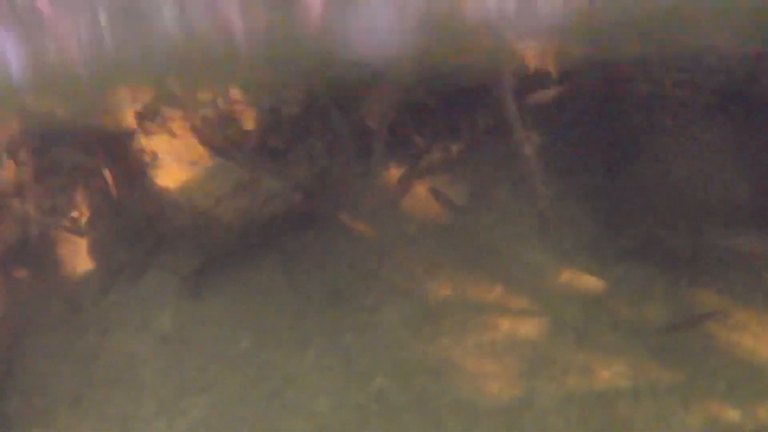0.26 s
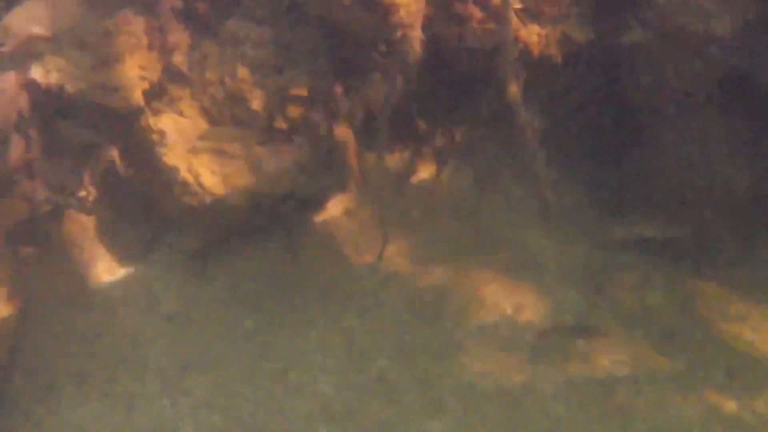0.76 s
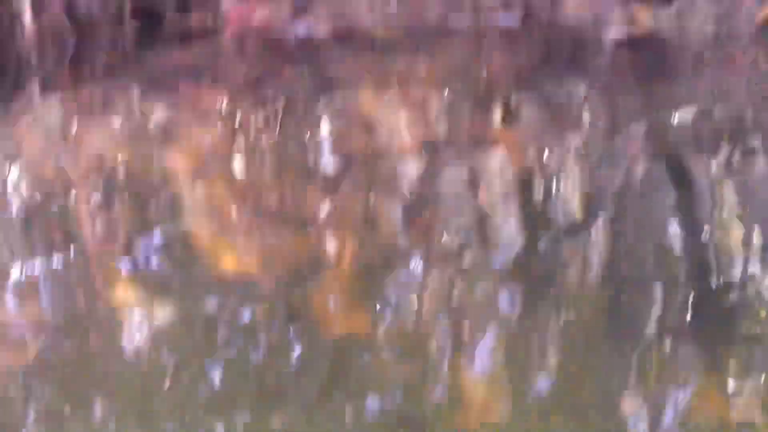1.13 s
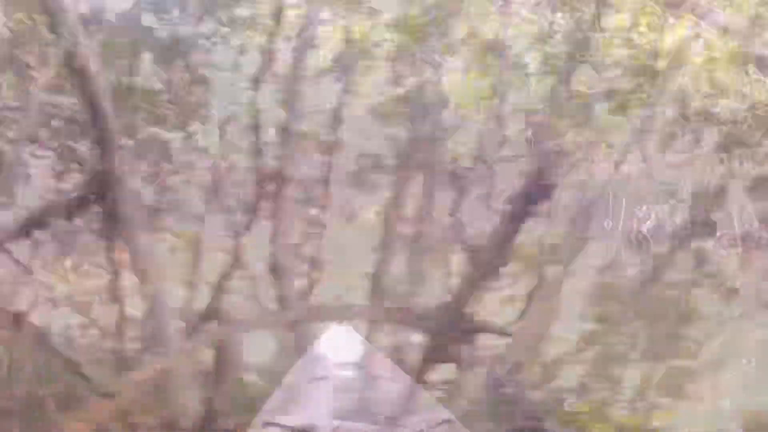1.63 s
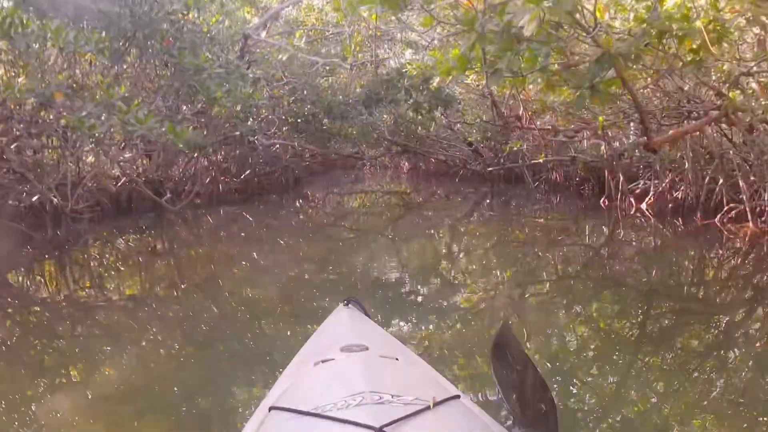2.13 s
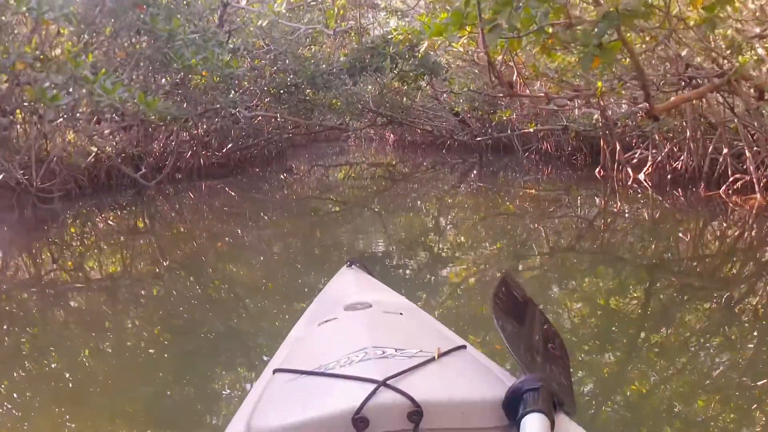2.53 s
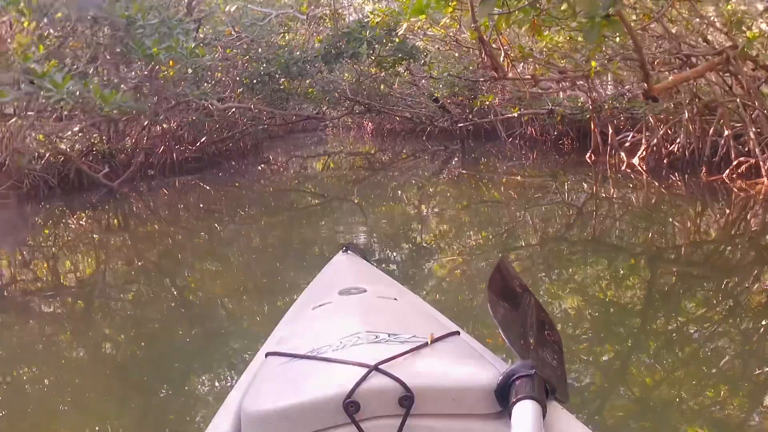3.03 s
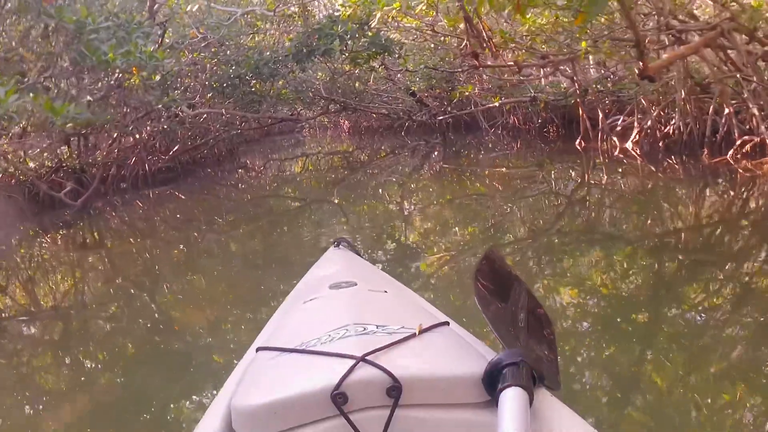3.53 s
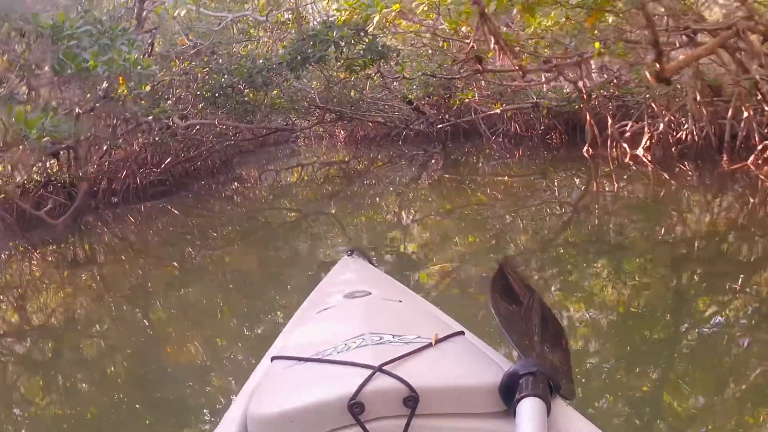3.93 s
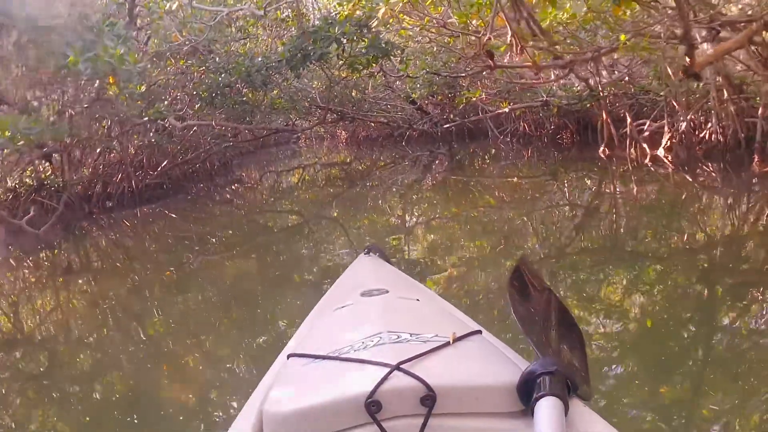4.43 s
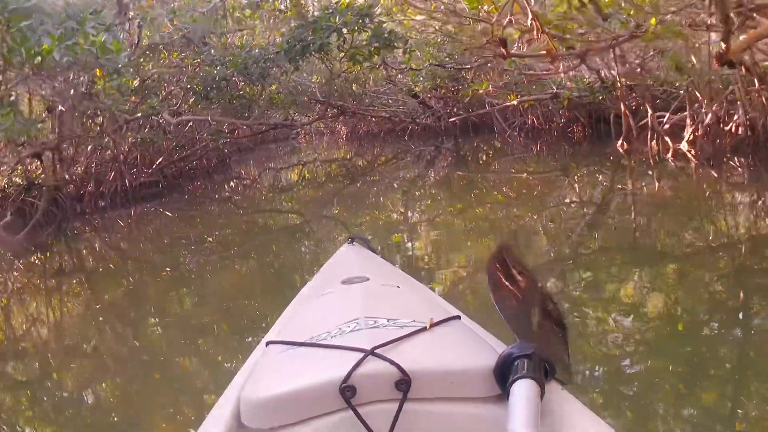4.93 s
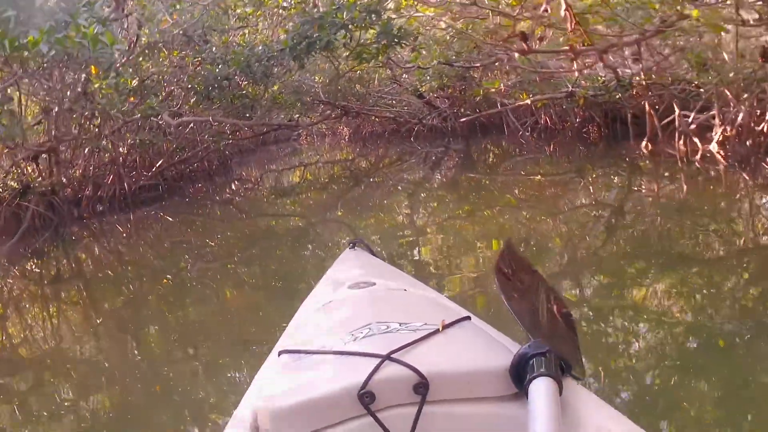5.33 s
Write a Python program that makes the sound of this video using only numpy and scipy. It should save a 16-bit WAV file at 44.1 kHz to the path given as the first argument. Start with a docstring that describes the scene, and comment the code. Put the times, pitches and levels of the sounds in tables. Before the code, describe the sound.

Inside a waterproof plastic case, dull water surges and low bumps buffet the microphone. It breaks the surface with a huge clipped thump, ticks and bright drips, followed by rubbing and hollow knocks. One sharp woody tap gives way to soft hiss, sparse dull thuds and a faint wavering motor hum outdoors; near the end small splashes and bubbles lap at the kayak hull.

```python
"""Waterproof case lifted from a creek

A waterproof case with a microphone inside is dragged through a creek beside a kayak and lifted out. Shaped
noise rumbles on the case, sine bubbles plink, and a thump at the surface overloads the input. Under water and
in the air, filtered blows and grains knock and rub the case's modes, and once it is out a far motor hums in
wavering sines. A late swish of grains and bubbles laps by the hull, over a soft hiss."""
import sys
import numpy as np
from scipy import signal
from scipy.fft import rfft, irfft
from scipy.io import wavfile
from scipy.ndimage import uniform_filter1d, map_coordinates

SR = 44100
rng = np.random.default_rng(int(sys.argv[2]) if len(sys.argv) > 2 else 0)


def log_audio(samples):
    """Write samples as a 16-bit WAV file to the path given in sys.argv[1]."""
    # one column per channel
    frames = np.atleast_2d(samples).T
    # limit to full scale, then quantise
    limited = np.clip(frames, -1, 1)
    pcm = np.round(limited * 32767).astype(np.int16)
    wavfile.write(sys.argv[1], SR, pcm)


N = 245195
TIME = np.arange(N) / SR

# background hiss spectrum: frequency_hz, density_db (relative, per Hz)
HISS_SPECTRUM = [(150, -4.5), (260, -5.5), (626, -8), (744, -8.5), (1110, -12.5), (1410, -13.5),
                 (1530, -14), (3760, -19.5), (13900, -25.5), (16000, -25.5)]
# low pressure swell spectrum: frequency_hz, density_db (relative, per Hz)
SWAY_SPECTRUM = [(5, -1), (10, 6.5), (22, -1.5), (35, -9), (50, -25.5), (80, -27), (140, -61), (300, -80)]
# eddies against the case, spectrum: frequency_hz, density_db (relative, per Hz)
CHURN_SPECTRUM = [(25, -11.5), (50, 8), (90, 3), (160, 1.5), (220, -8), (300, -9), (420, -18), (620, -40),
                  (1200, -65)]
# splashing by the hull, spectrum: frequency_hz, density_db (relative, per Hz)
SWISH_SPECTRUM = [(150, -29), (260, 4), (420, 1.5), (570, -8), (820, 4.5), (1140, -10), (1430, -7.5),
                  (2200, -9.5), (2700, -21), (4500, -16), (7000, -38), (13000, -45)]
# pitch of the far motor's upper tone: time_s, pitch_hz
MOTOR_PITCH = [(2.1, 175.5), (3.5, 177.6), (3.62, 179.8), (4.38, 179.8), (4.56, 176.3), (5.2, 180.7),
               (5.3, 176.1)]
# eddies that surge and die away: peak_s, peak_db, fall_db_per_s
SURGES = [(.07, -34, 99), (.607, -27.5, 217), (.71, -37, 280), (0.838, -25, 168), (0.969, -27, 35.5),
          (1.33, -35, 120), (1.58, -42.5, 61)]
# one slow wash along the hull: full_level_s, hold_s, level_db
HULL_WASH = [(4.82, 0.48, -59.5)]
# wavelets lapping around that wash: peak_s, peak_db
LAPS = [(4.8, -60), (4.92, -56.5), (4.99, -57.5), (5.3, -54)]
# modes of the plastic case: pitch_hz, gain_db, t60_s
CASE_MODES = [(191.8, 1.5, 0.18), (312, -11, 0.06), (409, -0.5, 0.032), (509, 3, 0.014), (834, -0.5, 0.036),
              (1044, -4.5, 0.019), (1348, -6, 0.029), (1736, -3.5, 0.01), (2130, -4.5, 0.014),
              (2600, -12.5, 0.02), (3350, -4.5, 0.0052), (4650, -18.5, 0.021), (4900, -19, 0.011),
              (5700, -31.5, .015)]
# water and fingers sliding over the case: full_level_s, hold_s, level_db
SLIDES = [(0.065, 0.15, -59), (0.842, 0.3, -55), (0.998, 0.25, -50.5), (1.217, 0.2, -48),
          (1.524, 0.072, -45), (1.734, 0.065, -49), (1.875, 0.33, -56.5)]
# drops falling on the water: start_s, bubble_level_db, bubble_pitch_hz,
# splat_level_db (against the bubble), splat_reach_hz
WATER_DROPS = [(1.1512, -26, 4350, -9, 4840), (1.1898, -31.5, 3660, 5.5, 12200),
               (1.209, -43, 1640, -15, 4000), (1.2265, -41, 4220, 3.5, 5500),
               (1.240, -46.5, 3430, -4, 9000), (1.2525, -48, 3380, -13, 4000),
               (1.2705, -41.5, 3220, -4.5, 4520), (1.2715, -40.5, 2450, 4.5, 4000),
               (4.722, -55.5, 3750, -1, 4500), (5.119, -53, 2230, -8, 3000), (5.158, -45, 850, -6, 2000),
               (5.164, -49, 2200, -1, 2500), (5.207, -44, 1424, 2, 2370), (5.308, -41, 940, -1.5, 1785)]
# blows on the case, soft bumps to hard ticks: start_s, peak_db, contact_centre_hz, scuff_decay_s
CASE_KNOCKS = [(0.064, -36.5, 394, 0.016), (.176, -40, 640, 0.0016), (0.599, -22.5, 87.4, 0.0021),
               (0.604, -33.5, 420, .0022), (0.699, -24, 102, 0.0024), (.726, -45, 870, 0.0061),
               (0.832, -28, 169, 0.0056), (.843, -44, 870, 0.0061), (.893, -28, 160, 0.002),
               (1.008, -40.5, 900, 0.0048), (1.140, -40, 2300, 0.0022), (1.190, -33.5, 1200, 0.0034),
               (1.357, -38, 1700, .005), (1.364, -26, 265, 0.02), (1.508, -34, 740, 0.0033),
               (1.595, -28, 1500, 0.0029), (1.596, -42.5, 4400, 0.0028), (1.604, -30.5, 250, 0.0044),
               (1.687, -37.5, 180, .004), (1.844, -40, 960, .013), (1.937, -37, 433, 0.0014),
               (1.968, -38, 980, 0.00065), (1.969, -26, 327, 0.0012), (2.180, -34.5, 79, .002),
               (2.388, -33.5, 68, .0023), (2.563, -38, 120, .002), (2.895, -32, 166, .0011),
               (3.655, -35.5, 151, 0.0056), (4.074, -32, 77.5, 0.0046)]
# modes of a sharp, woody tap on the boat's gear: pitch_hz, level_db (relative), t60_s
TAP_MODES = [(920, 3, 0.023), (1386, -3, 0.03), (1620, 3.5, 0.026), (2000, -14, .03), (2340, -2, 0.022),
             (3800, -17, 0.0087), (4970, -18, 0.0098)]
# ticks riding on the thump: start_s, peak_db
THUMP_TICKS = [(1.29, -24.5), (1.2977, -30), (1.3058, -52)]

SURFACE_S = 1.287   # the case breaks the surface
HISS_DB, HISS_DIP_S, HISS_DIP_WIDTH_S, HISS_DIP_DB = -57, 1.65, 0.44, -2.5   # the hiss dips briefly
MOTOR_FROM_S, MOTOR_HOLD_S, MOTOR_DB = 2.16, 2.24, -49.5   # upper tone at full level
MOTOR_FADE_IN_DB_PER_S, MOTOR_FADE_OUT_DB_PER_S = 19.5, 11.5
# the swell grows as the case is lifted towards the surface and settles once it is out
SWAY_REST_DB, SWAY_LIFT_DB = -35, -20
LIFT_RISE_DB_PER_S, LIFT_FALL_DB_PER_S = 17, 46.5
ROCK_DB, ROCK_PERIOD_S, ROCK_CREST_S = 1, 1.79, 4.06   # at rest the swell waxes and wanes slowly
SURGE_RISE_DB_PER_S, SUBMERGED_DB = 417, -50.5   # fast build; a little stirring while under water
WASH_RISE_DB_PER_S, WASH_FALL_DB_PER_S = 38, 42
LAP_RISE_DB_PER_S, LAP_FALL_DB_PER_S = 240, 220
SLIDE_RISE_DB_PER_S, SLIDE_FALL_DB_PER_S = 347, 165
BUBBLE_T60_S, BUBBLE_REF_HZ, BUBBLE_SIZE_LAW = 0.021, 3500, 0.85   # lower-pitched bubbles ring longer
SPLAT_T60_S, SPLAT_TOP_HZ = 0.017, 4000
CONTACT_OCTAVES = 1.24   # width of the band that a blow excites
TAP_S, TAP_DB = 2.074, -24.5
CUTOFF_HZ = 15800


def from_db(db):
    """Decibels to gain."""
    return 10 ** (np.asarray(db) / 20)


def rms_one(x):
    """Scale to rms 1."""
    return x / np.sqrt(np.mean(x ** 2) + 1e-20)


def peak_one(x):
    """Scale to peak 1."""
    return x / (np.abs(x).max() + 1e-20)


def add(out, s, sound):
    """Mix a sound in at time s."""
    at = max(round(s * SR), 0)
    out[at:at + len(sound)] += sound[:N - at]


def band(x, low_hz, high_hz, order=2):
    """Causal band-pass."""
    edges_hz = [max(low_hz, 10), min(high_hz, .45 * SR)]
    return signal.sosfilt(signal.butter(order, edges_hz, "band", fs=SR, output="sos"), x)


def coloured(x, spectrum):
    """Give a steady sound a spectrum; rms 1."""
    hz, db = np.transpose(spectrum)
    bins_hz = np.fft.rfftfreq(N, 1 / SR) + 0.0009   # keeps the logarithm finite at 0 Hz
    gain = from_db(np.interp(np.log(bins_hz), np.log(hz), db))
    return rms_one(irfft(rfft(x) * gain, N))


def drift(rate):
    """Smooth random wander through `rate` new values a second; rms 1."""
    knots = rng.standard_normal(2000)
    return rms_one(map_coordinates(knots, [TIME * rate], order=2, mode="wrap"))


def grains(per_s, spread_db):
    """Random tiny impacts, a few much larger than the rest."""
    sizes = from_db(spread_db * np.minimum(rng.exponential(1, N), 4)) * rng.choice([-1, 1], N)
    return sizes * (rng.random(N) < per_s / SR)


def swell_and_fade(full_s, hold_s, db, rise_db_per_s, fall_db_per_s):
    """Gain that rises to its level at full_s, holds, then dies away."""
    early = np.maximum(full_s - TIME, 0)
    late = np.maximum(TIME - full_s - hold_s, 0)
    return from_db(db - rise_db_per_s * early - fall_db_per_s * late)


def together(gains):
    """Overlapping movements add in power."""
    return np.sqrt(np.sum(np.square(gains), axis=0))


def case(force):
    """The plastic case rings in all its modes, each a two-pole resonator driven by the force."""
    out = 0
    for k, (hz, db, t60) in enumerate(CASE_MODES):
        radius = from_db(-60 / (t60 * SR))
        angle = 2 * np.pi * hz / SR
        poles = [1, -2 * radius * np.cos(angle), radius * radius]
        ring = signal.lfilter([1, 0, -1], poles, force + 1e-18)
        out = out + (-1) ** k * from_db(db) * ring   # alternate modes are inverted
    return out


def air():
    """Steady soft hiss of shaped noise that dips briefly."""
    dip_db = HISS_DIP_DB * np.exp(-((TIME - HISS_DIP_S) / HISS_DIP_WIDTH_S) ** 2)
    return from_db(HISS_DB + dip_db) * coloured(rng.standard_normal(N), HISS_SPECTRUM)


def motor(octave_db=-22, lower_ratio=.637, lower_db=-57.0, drone_db=-53):
    """Two wavering tones over a dull drone, heard only above the water; the upper has a faint octave."""
    times_s, pitches_hz = np.transpose(MOTOR_PITCH)
    phase = 2 * np.pi * np.cumsum(np.interp(TIME, times_s, pitches_hz)) / SR
    level = swell_and_fade(MOTOR_FROM_S, MOTOR_HOLD_S, MOTOR_DB,
                           MOTOR_FADE_IN_DB_PER_S, MOTOR_FADE_OUT_DB_PER_S)
    wavering = phase + .15 * drift(10)
    tone = np.sin(wavering) + from_db(octave_db) * np.sin(2 * wavering)
    upper = tone * level * from_db(1.3 * drift(7.5))
    lower = np.sin(lower_ratio * phase + .6 * drift(7)) * from_db(lower_db + 1.5 * drift(8))
    drone = from_db(drone_db) * rms_one(band(rng.standard_normal(N), 43, 190))
    above_water = np.clip((TIME - SURFACE_S) / 0.26, 0, 1)
    return above_water * (np.sqrt(2) * (upper + lower) + drone)   # root two: tone levels are rms


def sway():
    """Very low pressure swell as the case is moved about; it pauses as the surface is crossed."""
    swell = coloured(rng.standard_normal(N), SWAY_SPECTRUM)
    power = band(swell, 22, 55) ** 2
    # the audible part is held steady
    evened = swell / np.sqrt(uniform_filter1d(power, size=8000) + 0.1 * power.mean())
    crossing = np.exp(-((TIME - SURFACE_S) / .05) ** 4)
    lift = swell_and_fade(SURFACE_S, 0, SWAY_LIFT_DB, LIFT_RISE_DB_PER_S, LIFT_FALL_DB_PER_S)
    rock_db = ROCK_DB * np.cos(2 * np.pi * (TIME - ROCK_CREST_S) / ROCK_PERIOD_S)
    rest = from_db(SWAY_REST_DB + rock_db)
    return np.maximum(lift, rest) * (1 - crossing) * evened


def churn():
    """Eddies buffet the case: dense low-coloured grains surge and die away."""
    surges = [swell_and_fade(s, 0, db, SURGE_RISE_DB_PER_S, fall) for s, db, fall in SURGES]
    stirring = from_db(SUBMERGED_DB) * (TIME < SURFACE_S)
    buffeting = coloured(grains(per_s=600, spread_db=2.0), CHURN_SPECTRUM)
    return together([stirring, *surges]) * buffeting


def burble(count=90, low_hz=620, high_hz=2400, cycles=22, bend=0.15, spread_db=12.0):
    """Small bubbles at random times; each rings down as its pitch rises, higher ones softer."""
    out, t = np.zeros(N), TIME[:SR // 12]
    for when, smallness, strength in rng.random((count, 3)):
        hz = low_hz * (high_hz / low_hz) ** smallness
        life = t * hz / cycles   # reaches 1 when the ring is 60 dB down
        phase = 2 * np.pi * hz * t * (1 + bend * np.minimum(life, 1))
        ring = np.sin(phase) * from_db(-60 * life)
        add(out, 4.3 + 1.25 * when, from_db(spread_db * strength) * np.sqrt(low_hz / hz) * ring)
    return out / out[TIME > 4.3].std()


def swish(case_db=-7.0, wash_db=0.0, bubble_db=-4.5):
    """Fine splashing and bubbles by the hull, coloured by the case that they are heard through."""
    wash = from_db(wash_db) * coloured(grains(per_s=2000, spread_db=1.5), SWISH_SPECTRUM)
    splashes = band(grains(per_s=300, spread_db=8.5), 364, 4900, order=1)
    ringing = from_db(case_db) * rms_one(case(splashes))
    flow = [swell_and_fade(s, hold_s, db, WASH_RISE_DB_PER_S, WASH_FALL_DB_PER_S)
            for s, hold_s, db in HULL_WASH]
    laps = [swell_and_fade(s, 0, db, LAP_RISE_DB_PER_S, LAP_FALL_DB_PER_S) for s, db in LAPS]
    return together(flow + laps) * (wash + ringing + from_db(bubble_db) * burble())


def rub():
    """Tiny slips on the wet case excite its modes."""
    slides = [swell_and_fade(s, hold_s, db, SLIDE_RISE_DB_PER_S, SLIDE_FALL_DB_PER_S)
              for s, hold_s, db in SLIDES]
    return together(slides) * rms_one(case(grains(per_s=1100, spread_db=3.5)))


def drops():
    """A drop splats as a noise burst and traps a small bubble that rings as a decaying sine."""
    out, t = np.zeros(N), TIME[:SR // 10]
    for s, db, hz, splat_db, reach_hz in WATER_DROPS:
        t60 = BUBBLE_T60_S * (BUBBLE_REF_HZ / hz) ** BUBBLE_SIZE_LAW
        onset = 1 - np.exp(-t / .0004)
        bubble = np.sin(2 * np.pi * hz * t) * from_db(-60 * t / t60) * onset
        burst = rng.standard_normal(len(t)) * from_db(-60 * t / SPLAT_T60_S)
        splat = band(band(burst, 670, reach_hz, order=4), 430, SPLAT_TOP_HZ, order=1)
        add(out, s, from_db(db) * (peak_one(bubble) + from_db(splat_db) * peak_one(splat)))
    return out


def knocks(scuff=0.13, thud_hz=130):
    """Each blow is a push and a short scuff; slow pushes pass as a dull thud, quick ones ring the case."""
    out, t = np.zeros(N), TIME[:SR // 5]
    half_width = 2 ** (CONTACT_OCTAVES / 2)
    for s, db, hz, scuff_s in CASE_KNOCKS:
        low_hz, high_hz = hz / half_width, hz * half_width
        grit_gain = scuff * min(high_hz / 1000, 2)   # quicker contacts are grittier
        grit = grit_gain * rng.standard_normal(len(t)) * np.exp(-t / scuff_s)
        force = band((t == 0) + grit, low_hz, high_hz)
        thud = (thud_hz / low_hz) ** 2 * peak_one(force)
        add(out, s, from_db(db) * peak_one(peak_one(case(force)) + thud))
    return out


def tap():
    """A hard contact sets a few short modes ringing."""
    out, t = np.zeros(N), TIME[:SR // 10]
    ring = np.zeros(len(t))
    for k, (hz, db, t60) in enumerate(TAP_MODES):
        ring += (-1) ** k * from_db(db - 60 * t / t60) * np.sin(2 * np.pi * hz * t)
    add(out, TAP_S, from_db(TAP_DB) * peak_one(ring))
    return out


def crackle(dull_hz=900):
    """Bare sharp ticks that ride on the thump, each an instant jump and a quick decay."""
    out, t = np.zeros(N), TIME[:SR // 100]
    for s, db in THUMP_TICKS:
        add(out, s, from_db(db) * np.exp(-2 * np.pi * dull_hz * t))
    return out


def surfacing(build_s=0.0061, pull_db=-2.5, release_s=0.0024,
              rebound_db=1.5, rebound_hz=19, rebound_s=0.022,
              wall_db=-2.5, wall_hz=192, wall_s=0.015, upper_db=-22, upper_hz=285, upper_s=0.014):
    """Suction builds as the case leaves the water, then lets go: a slow rebound and two wall modes."""
    t = np.maximum(TIME - SURFACE_S, 0)
    building = np.exp(np.minimum(TIME - SURFACE_S, 0) / build_s)
    pull = from_db(pull_db) * np.exp(-t / release_s)
    wall = from_db(wall_db) * np.cos(2 * np.pi * wall_hz * t) * np.exp(-t / wall_s)
    upper = from_db(upper_db) * np.cos(2 * np.pi * upper_hz * t) * np.exp(-t / upper_s)
    rebound = from_db(rebound_db) * np.sin(2 * np.pi * rebound_hz * t) * np.exp(-t / rebound_s)
    return rebound - building * (pull + wall + upper)


def scene():
    """Everything reaches the one microphone in the case."""
    water = churn() + swish() + drops() + crackle() + surfacing()
    handling = sway() + rub() + knocks() + tap()
    return (air() + motor() + handling + water)[None]


def record(dry):
    """The input clips hard; a steep low-pass cuts the top."""
    clipped = np.clip(dry, -.93, .93)
    return signal.sosfilt(signal.ellip(10, .1, 80, CUTOFF_HZ, fs=SR, output="sos"), clipped)


dry = scene()
out = record(dry)
log_audio(out)
```